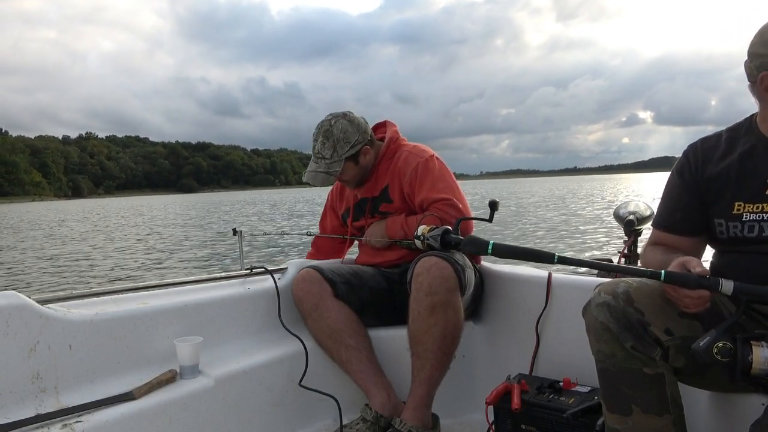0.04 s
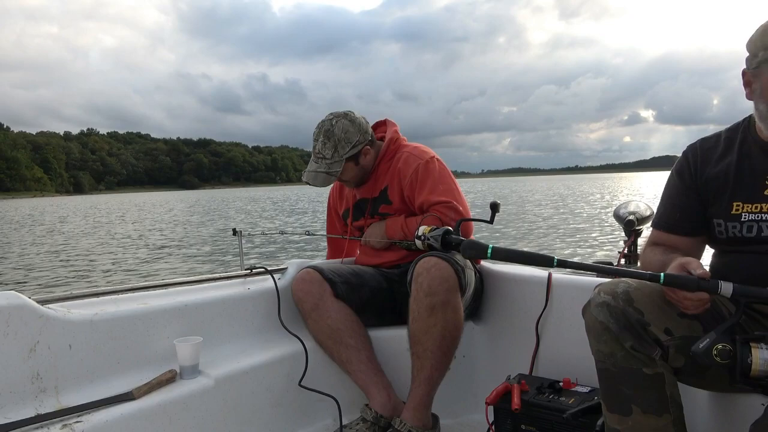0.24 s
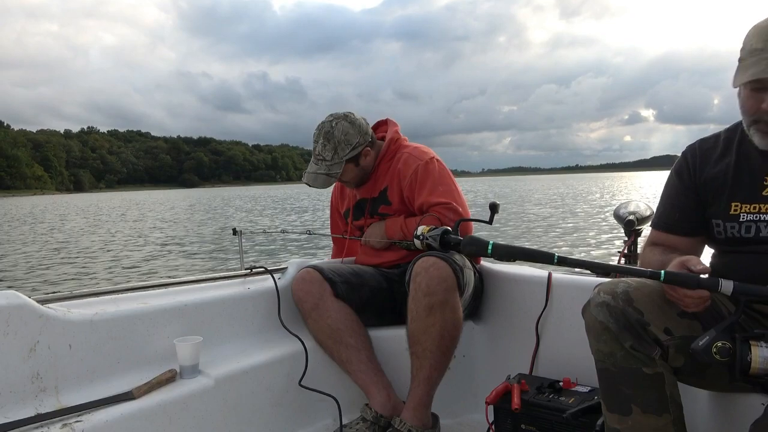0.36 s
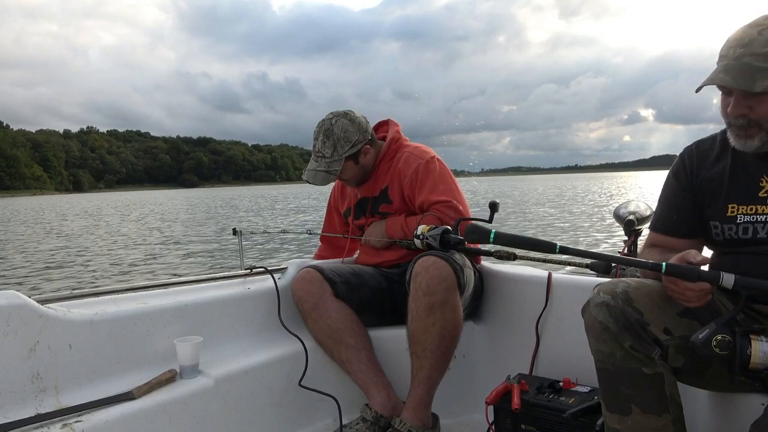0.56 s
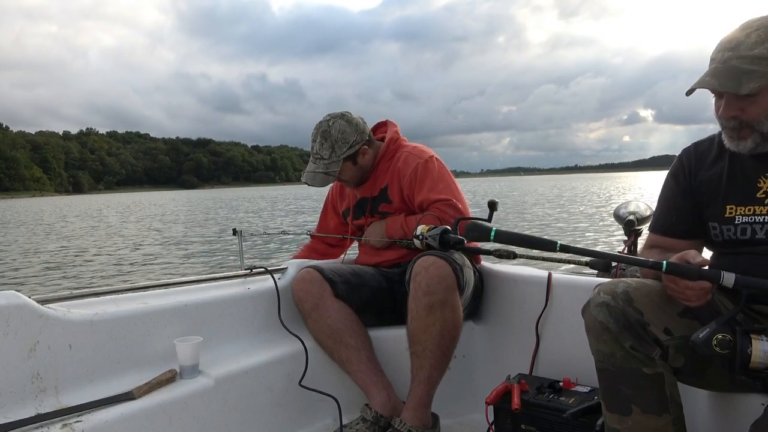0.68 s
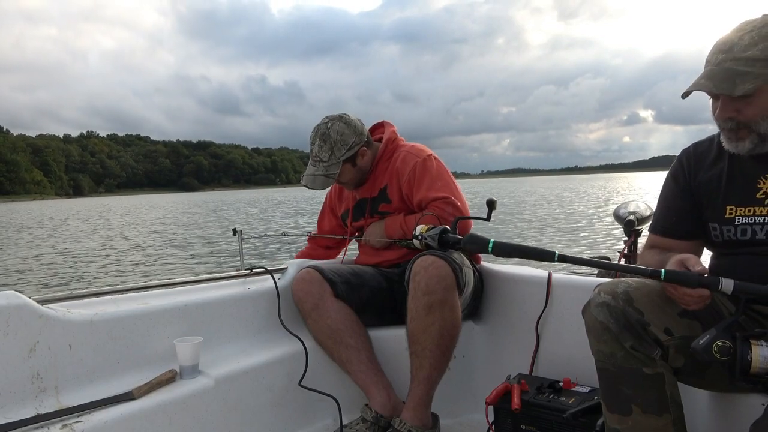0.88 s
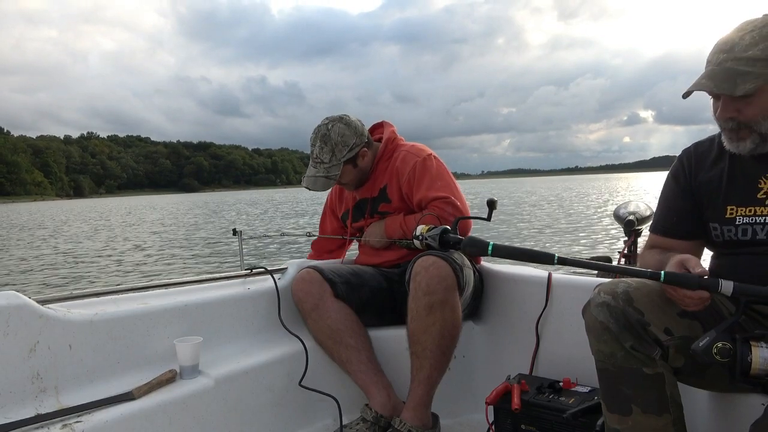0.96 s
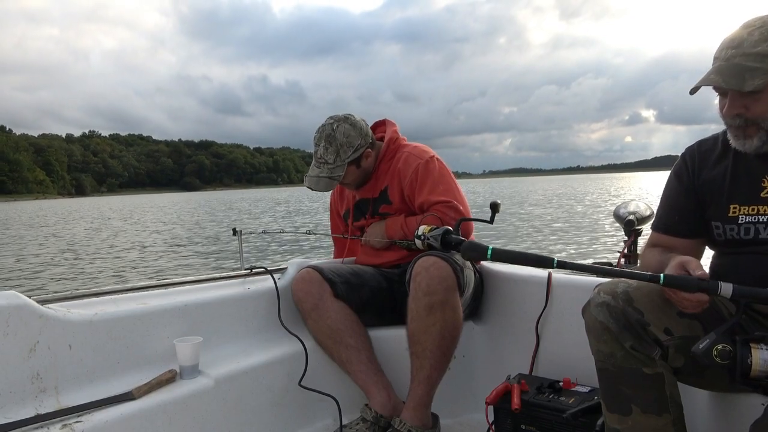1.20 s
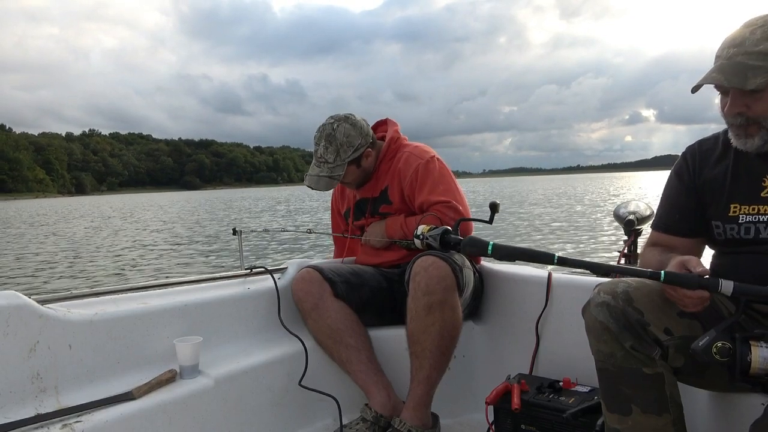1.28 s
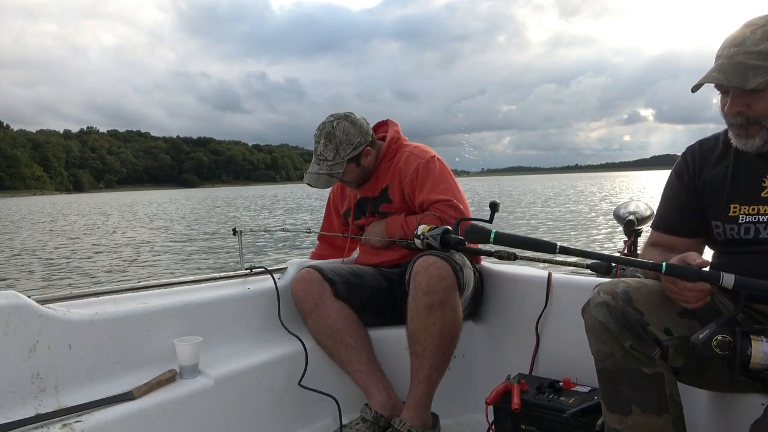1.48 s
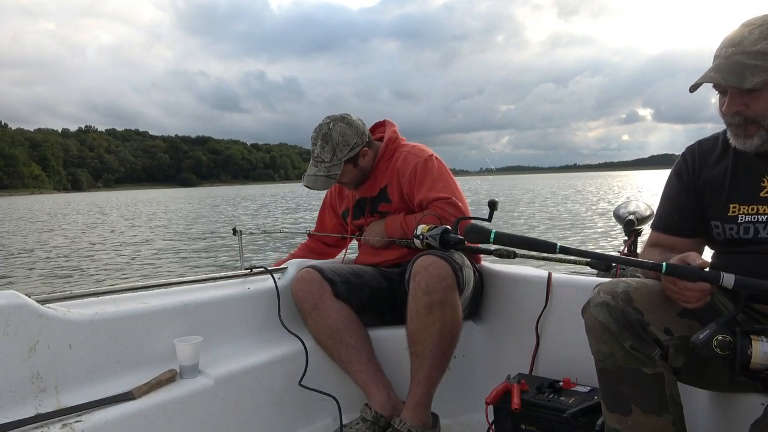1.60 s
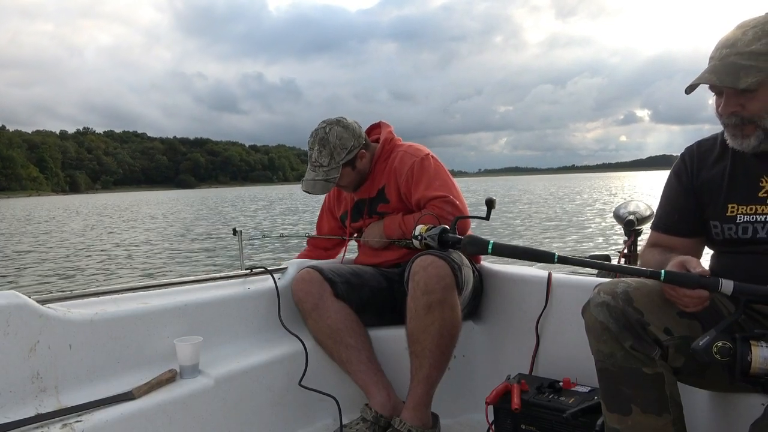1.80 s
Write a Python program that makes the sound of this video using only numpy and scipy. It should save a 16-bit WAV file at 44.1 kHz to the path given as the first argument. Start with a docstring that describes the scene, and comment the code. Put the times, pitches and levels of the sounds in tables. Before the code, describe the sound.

A wooden tool plops into water twice, with light splashes and wind on the microphone.

```python
"""Wind rumbles on the microphone over a faint wash of ripples. An angler strikes the lake beside a
small boat with a cupped wooden tool: it slaps the surface and drags down an air pocket that rings
with a hollow, rising plop, coloured by the hull. Spray patters back and a thin, far bird calls.
A soft swish leads into the second stroke, and the bird calls again as the drops fall."""
import sys
import numpy as np
from scipy import signal
from scipy.fft import rfft, irfft, next_fast_len
from scipy.io import wavfile
from scipy.ndimage import map_coordinates

SR = 44100
rng = np.random.default_rng(int(sys.argv[2]) if len(sys.argv) > 2 else 0)


def transcribe(signal):
    """Save signal, clipped to [-1, 1], as a 16-bit WAV file at the path in sys.argv[1]."""
    frames = np.atleast_2d(signal).T
    limited = np.clip(frames, -1, 1)
    pcm = np.round(limited * 32767).astype(np.int16)
    wavfile.write(sys.argv[1], SR, pcm)


N = 81585

# Tool strokes: entry_s, slap_db, open_s, plop_db, pitch_hz, rise_hz_per_s, top_hz, plop_t60_s,
# spray_db, spray_t60_s
TOOL_STROKES = [(.167, -23.5, .1803, 1.5, 175.6, 6180, 583, 0.11, -37, 0.41),
                (1.0679, -25.5, 1.0823, 1.5, 175.5, 6900, 506, 0.083, -34.5, 0.27)]
# Upper pocket modes: pitch_hz, rise_hz_per_s, top_hz, level_re_plop_db, t60_s, swell_s
POCKET_MODES = [(783.4, 7000, 1010, -17, .1, 0.032), (1230, 5700, 1500, -29, 0.056, 0.004)]
SHOVE_RE_PLOP_DB, SHOVE_HZ, SHOVE_T60_S = -15.5, 100.6, 0.085
ROUGHNESS_DB, DEEP_RING_DB, UPPER_RING_DB = 4, -18.5, -6

def plops():
    """The tool shoves the water; the air pocket rings in one deep mode and rough upper modes."""
    deep, upper = np.zeros(N), np.zeros(N)
    for entry_s, _, open_s, plop_db, hz, rise, top_hz, t60_s, _, _ in TOOL_STROKES:
        deep += amp(plop_db) * pocket(open_s, hz, rise, top_hz, t60_s, swell_s=0.004)
        shove = bubble(entry_s, SHOVE_HZ, 0, SHOVE_T60_S, swell_s=0.01)
        deep += amp(plop_db + SHOVE_RE_PLOP_DB) * shove
        for hz, rise, top_hz, mode_db, t60_s, swell_s in POCKET_MODES:
            level_db = plop_db + mode_db + ROUGHNESS_DB * wobble(knots_per_s=150)
            upper += amp(level_db) * pocket(open_s, hz, rise, top_hz, t60_s, swell_s)
    ring = amp(DEEP_RING_DB) * boat_ring(deep) + amp(UPPER_RING_DB) * boat_ring(upper)
    return filtered(deep + upper, hull) + ring


def pocket(start_s, hz, rise_hz_per_s, top_hz, t60_s, swell_s):
    """A big air pocket: pitch climbs as it closes, levelling off at top_hz."""
    t = since(start_s)
    pitch_hz = hz + (top_hz - hz) * np.tanh(rise_hz_per_s * t / (top_hz - hz))
    cycles = np.cumsum(pitch_hz * (t > 0)) / SR
    return -np.sin(2 * np.pi * cycles) * ring_envelope(t, swell_s, t60_s)


# Slap spectrum: freq_hz, gain_db
SLAP_SPECTRUM = [(180, -43), (300, 4.5), (731, -12.5), (1280, -5), (1750, -11), (2100, -6.5), (2360, -6),
                 (3230, -14.5), (4350, -14), (4800, -15), (5660, -16), (6250, -9), (7250, -22.5),
                 (9600, -24.5), (15500, -44)]
# Tool resonances: centre_hz, width_hz, lift_db
TOOL_MODES = [(1224, 370, 9), (2434, 74, 8.5), (4694, 130, 11), (6400, 300, 1)]

def slaps():
    """The tool hits the surface: a noise burst coloured by the ring of the wood."""
    def colour_db(f):
        wood_db = sum(db / (1 + (2 * (f - hz) / width_hz) ** 2) for hz, width_hz, db in TOOL_MODES)
        return along(SLAP_SPECTRUM, f) + wood_db

    out = np.zeros((2, N))
    for entry_s, slap_db, *_ in TOOL_STROKES:
        impact = coloured(crackle(per_s=9000, hiss=1.45), colour_db, NEAR_FIELD)
        out += amp(slap_db) * burst(entry_s, rise_s=0.0071, t60_s=0.042) * impact
    return out


# Spray spectrum: freq_hz, gain_db
SPRAY_SPECTRUM = [(200, -31), (650, -10), (950, 5), (1300, -7.5), (1800, -4.5), (2500, -10.5), (3500, -11),
                  (6000, -18.5), (8500, -21.5), (15000, -47)]

def spray():
    """Water tears into spray as each pocket opens."""
    out = np.zeros((2, N))
    for _, _, open_s, *_, spray_db, t60_s in TOOL_STROKES:
        tearing = coloured(crackle(per_s=1200, hiss=0.82), lambda f: along(SPRAY_SPECTRUM, f), NEAR_FIELD)
        out += amp(spray_db) * burst(open_s, 0.0056, t60_s) * tearing
    return out


# Falling spray spectrum: freq_hz, gain_db
PATTER_SPECTRUM = [(200, -20), (700, -0.5), (1150, 8), (1700, -8), (2400, -2), (3500, -7.5), (6000, -7.5),
                   (9000, -18), (15000, -26)]
PATTER_DB, PATTER_DELAY_S, PATTER_SPREAD_S = -54, 0.32, 0.15

def patter():
    """Spray falls back after each stroke."""
    out = np.zeros((2, N))
    for entry_s, *_ in TOOL_STROKES:
        fall = gaussian(entry_s + PATTER_DELAY_S, PATTER_SPREAD_S) * (since(entry_s) > 0)
        hits = coloured(crackle(per_s=220, hiss=0.99), lambda f: along(PATTER_SPECTRUM, f), WIDE_FIELD)
        out += amp(PATTER_DB) * fall * hits
    return out


# Ringing bubbles: falling drops, plus the gulp of the dipping tool at 1.019 s: start_s, level_db, pitch_hz,
# t60_s, tick_re_bubble_db
RINGING_BUBBLES = [(.211, -28.5, 1166, 0.075, -27), (.244, -28.5, 530, .05, -26),
                   (0.244, -35.5, 2650, .04, -10), (.272, -35.5, 1320, 0.042, -9),
                   (0.36, -50.5, 1050, 0.021, -0.5), (0.413, -50, 1300, 0.04, -14),
                   (0.514, -32.5, 1080, 0.026, -26), (.537, -45, 1070, 0.038, -3.5),
                   (.558, -41, 970, .035, -20), (1.0189, -24, 717, 0.012, -21.5),
                   (1.165, -41, 1190, 0.045, -9), (1.285, -35, 2410, 0.023, -17),
                   (1.286, -50, 437, 0.38, -16), (1.355, -41, 1260, .05, -29),
                   (1.386, -44.5, 1970, 0.033, -10), (1.409, -48, 1660, 0.14, -22),
                   (1.446, -39, 1230, 0.033, -13), (1.776, -44.5, 1120, 0.029, -16)]
# Small sharp splashes: start_s, level_db, centre_hz, t60_s
SPLASHING_DROPS = [(0.212, -44, 4540, 0.0091), (0.36, -45, 5400, 0.016), (0.522, -47.5, 9000, 0.05),
                   (0.901, -52, 5400, 0.046), (1.09, -29.5, 1660, .022), (1.2852, -39, 2310, 0.026),
                   (1.448, -46, 6000, .02), (1.547, -44, 6960, 0.027), (1.775, -43, 5660, 0.034)]
BUBBLE_RISE_PER_S, WET_CUTOFF_HZ = 2.1, 8900

def drops():
    """Larger drops tick and ring a bubble, or only splash; the dipping tool gulps once before the second
    stroke; wet contact softens the treble."""
    out = np.zeros((2, N))
    tick_noise = coloured(noise(), lambda f: along(PATTER_SPECTRUM, f), NEAR_FIELD)
    for start_s, db, hz, t60_s, tick_db in RINGING_BUBBLES:
        ring = bubble(start_s, hz, BUBBLE_RISE_PER_S * hz, t60_s, swell_s=0.00033)
        tick = amp(tick_db) * tick_noise * burst(start_s, rise_s=0.0013, t60_s=0.045)
        out += amp(db) * (ring + tick)
    for start_s, db, hz, t60_s in SPLASHING_DROPS:
        peak_db = lambda f: -7 * np.abs(np.log2((f + 1) / hz)) - 3 * np.log2(1 + f / hz)
        out += amp(db) * burst(start_s, 0.00076, t60_s) * coloured(noise(), peak_db, NEAR_FIELD)
    return filtered(out, lambda f: 1 / np.sqrt(1 + (f / WET_CUTOFF_HZ) ** 4))


DRIPS_PER_STROKE, DRIP_DB, DRIP_HZ, DRIP_LOG_SPREAD, DRIP_T60_CYCLES = 48, -52, 3614, 0.454, 82

def drips():
    """Returning spray traps tiny bubbles, spread over the water."""
    out = np.zeros((2, N + SR))
    t = np.arange(SR // 20) / SR
    for entry_s, *_ in TOOL_STROKES:
        for when, pitch, size, side in rng.standard_normal((DRIPS_PER_STROKE, 4)):
            hz = np.clip(DRIP_HZ * np.exp(DRIP_LOG_SPREAD * pitch), 800, 7000)
            delay_s = np.clip(PATTER_DELAY_S + PATTER_SPREAD_S * when, 0.06, 0.7)
            start = int((entry_s + delay_s) * SR)
            tone = np.sin(2 * np.pi * hz * t * (1 + BUBBLE_RISE_PER_S * t / 2))
            gain = amp(DRIP_DB + 2.3 * size + 2 * side * np.array([[1], [-1]]))
            out[:, start:start + len(t)] += gain * tone * ring_envelope(t, 0.00042, DRIP_T60_CYCLES / hz)
    return out[:, :N]


def bubble(start_s, hz, rise_hz_per_s, t60_s, swell_s):
    """Trapped air rings, its pitch climbing as it shrinks."""
    t = since(start_s)
    return -np.sin(2 * np.pi * (hz * t + rise_hz_per_s * t * t / 2)) * ring_envelope(t, swell_s, t60_s)


# Hull standing waves: centre_hz, width_hz, left_gain, right_gain
HULL_MODES = [(305, 36, 1.2, -.55), (415, 40, .6, .4), (945, 40, .7, .7)]
# Reflections off the far parts of the boat: delay_s, gain
BOAT_ECHOES = [(.0201, .12), (.0352, .055), (.0478, .045)]

def hull(f):
    """Stereo response: direct sound, standing waves and echoes."""
    modes = sum(np.array([[left], [right]]) * 1j * f * width_hz / (hz * hz - f * f + 1j * f * width_hz)
                for hz, width_hz, left, right in HULL_MODES)
    echoes = sum(gain * np.exp(-2j * np.pi * f * delay_s) for delay_s, gain in BOAT_ECHOES)
    return 1 + modes + echoes


# Boat decay: freq_hz, t60_s
BOAT_DECAY = [(150, 0.18), (300, .2), (1000, 0.053), (4000, 0.3), (12000, 0.12)]

def boat_ring(x):
    """The short diffuse ring of the open boat."""
    hz, t, spectra = signal.stft(rng.standard_normal((2, SR // 4)), SR, nperseg=256)
    decay = amp(-60 * t / along(BOAT_DECAY, hz)[:, None])
    _, tail = signal.istft(spectra * decay, SR, nperseg=256)
    tail = np.pad(tail / np.linalg.norm(tail[0]), ((0, 0), (SR // 200, 0)))  # 5 ms predelay
    return signal.fftconvolve(x * np.ones((2, 1)), tail, axes=1)[:, :N]


# Swish spectrum: freq_hz, gain_db
SWISH_SPECTRUM = [(290, -62), (500, -26), (629, -6), (1410, -2.5), (1720, -15), (1850, -13), (6740, -12.5),
                  (15500, -21)]
SWISH_DB, SWISH_CUTOFF_HZ = -43, 13000

def swish():
    """A soft hiss swells and fades before the second stroke."""
    colour_db = lambda f: along(SWISH_SPECTRUM, f) - 10 * np.log10(1 + (f / SWISH_CUTOFF_HZ) ** 6)
    swell = gaussian(centre_s=0.997, sigma_s=0.016)
    return amp(SWISH_DB) * swell * coloured(noise(), colour_db, WIDE_FIELD)


# Gusts, in four consecutive groups: time_s, rumble_db, flutter_db, left_minus_right_db
GUSTS = [
    [(0.02, -32, -46, -0.5), (0.038, -34, -31.5, 6.5), (0.058, -30.5, -35, 11), (0.088, -27, -47.5, 11.0),
     (0.114, -34.5, -62, 0), (0.142, -34, -51, 18), (0.16, -24.5, -43, 5)],
    [(0.25, -37.5, -25.5, 8), (0.416, -26, -30, 8), (0.448, -43, -37, 7), (0.482, -24.5, -26.5, 8),
     (0.542, -24, -34.5, 6.5), (0.588, -35.5, -32.5, 7), (0.66, -32.5, -37.5, 3.0)],
    [(0.67, -30, -31.5, 7), (0.742, -21.5, -31.5, 6.5), (0.882, -32, -42, 16), (0.908, -32.5, -36, 0),
     (0.974, -31, -29.5, 8), (1.028, -25, -39.5, -21), (1.055, -26.5, -38, 3.5)],
    [(1.15, -46, -46, 1), (1.216, -34.5, -49, -9.5), (1.326, -31.5, -36, 11), (1.464, -35, -38.5, 2.5),
     (1.546, -25, -34, 15.5), (1.804, -34, -47.5, -5), (1.85, -55, -38, 9)],
]
# Buffeting spectra: freq_hz, gain_db
RUMBLE_SPECTRUM = [(10, -7), (25, 0.5), (48, -0.5), (70, -3), (100, -17), (200, -22), (1000, -120)]
FLUTTER_SPECTRUM = [(30, -23), (65, -3.5), (95, 1.5), (130, -11), (170, -17), (220, -24.5), (320, -25.5),
                    (500, -48), (1000, -57), (3000, -120)]
RUMBLE_TRIM_DB, FLUTTER_TRIM_DB = 6, 2.5

def wind():
    """Gusts buffet each microphone port separately, the left more: deep rumble, higher flutter."""
    time_s, rumble_db, flutter_db, pan_db = np.concatenate(GUSTS).T

    def buffet(spectrum, level_db):
        turbulence = unit(filtered(noise(), lambda f: amp(along(spectrum, f))))
        return amp(curve(np.c_[time_s, level_db])) * turbulence

    rumble = buffet(RUMBLE_SPECTRUM, rumble_db + RUMBLE_TRIM_DB)
    flutter = buffet(FLUTTER_SPECTRUM, flutter_db + FLUTTER_TRIM_DB)
    pan = amp(curve(np.c_[time_s, pan_db]) * np.array([[0.5], [-0.5]]))
    pan /= np.sqrt(np.mean(pan ** 2, axis=0))
    return pan * (rumble + flutter)


# Ripple spectrum: freq_hz, gain_db
RIPPLE_SPECTRUM = [(240, -21), (400, -8), (511, -5.5), (834, -10), (914, -8), (1260, -11.5), (2970, -17.5),
                   (3460, -19.5), (5070, -19), (6090, -21.5), (15500, -27.5)]
# Ripple loudness: time_s, level_db
RIPPLE_LEVEL = [(0.0, -50.5), (0.458, -53.5), (0.716, -54), (0.948, -55), (1.246, -53.5), (1.586, -56),
                (1.85, -53.5)]

def ripples():
    """The lake's even wash: tiny splashes in hiss."""
    wash = coloured(crackle(per_s=600, hiss=2.74), lambda f: along(RIPPLE_SPECTRUM, f), WIDE_FIELD)
    return amp(curve(RIPPLE_LEVEL)) * wash


# Bird calls: start_s, level_db, pitch_hz, length_s
BIRD_CALLS = [(0.721, -58.5, 5150, 0.044), (1.228, -58, 5570, .055)]
BIRD_FALL_HZ, BIRD_TRIM_DB = 800, -3

def bird():
    """Thin falling calls from far away."""
    calls = np.zeros(N)
    for start_s, db, hz, length_s in BIRD_CALLS:
        progress = np.minimum(since(start_s) / length_s, 1)
        pitch_hz = hz - BIRD_FALL_HZ * progress ** 2
        calls += amp(db) * np.sin(np.pi * progress) * np.sin(2 * np.pi * np.cumsum(pitch_hz) / SR)
    return amp(BIRD_TRIM_DB) * (calls + boat_ring(calls))


# Left-right likeness of close and spread sources: freq_hz, correlation
NEAR_FIELD = [(300, 0.94), (1300, 0.97), (4000, 0.82), (8000, 0.19), (15000, 0.085)]
WIDE_FIELD = [(100, .3), (600, 0.41), (1300, 0.66), (3000, 0.17), (7000, 0.083), (15000, 0.044)]

def coloured(pair, colour_db, field):
    """Two unrelated signals as stereo of rms 1, with the given spectrum and correlation."""
    def response(hz):
        angle = np.arccos(np.clip(along(field, hz), -1, 1)) / 2
        return amp(colour_db(hz)) * np.array([np.cos(angle), np.sin(angle)])

    mid, side = filtered(pair, response)
    return unit(np.array([mid + side, mid - side]))


def filtered(x, response):
    size = next_fast_len(N + SR // 2)
    return irfft(rfft(x, size) * response(np.fft.rfftfreq(size, 1 / SR)), size)[..., :N]


def noise():
    return rng.standard_normal((2, N))


def crackle(per_s, hiss):
    """Tiny random impacts over a share of hiss."""
    hits = rng.random(N) < per_s / SR
    return unit(noise() * hits) + hiss * noise()


def wobble(knots_per_s):
    """A smooth random curve."""
    knots = rng.standard_normal(int(N * knots_per_s / SR) + 4)
    return map_coordinates(knots, [np.arange(N) * knots_per_s / SR])


def burst(start_s, rise_s, t60_s):
    """Linear rise, exponential fall."""
    return np.minimum(since(start_s) / rise_s, 1) * amp(-60 * since(start_s + rise_s) / t60_s)


def ring_envelope(t, swell_s, t60_s):
    return (1 - np.exp(-t / swell_s)) * amp(-60 * t / t60_s)


def gaussian(centre_s, sigma_s):
    return np.exp(-((np.arange(N) / SR - centre_s) / sigma_s) ** 2 / 2)


def since(start_s):
    return np.maximum(np.arange(N) / SR - start_s, 0)


def along(rows, hz):
    """Interpolate (freq_hz, value) rows on a log axis."""
    freq_hz, values = np.transpose(rows)
    return np.interp(np.log(hz + 1), np.log(freq_hz + 1), values)


def curve(rows):
    """Interpolate (time_s, value) rows per sample."""
    return np.interp(np.arange(N) / SR, *np.transpose(rows))


def amp(db):
    return 10 ** (np.asarray(db) / 20)


def unit(x):
    return x / np.sqrt(np.mean(x ** 2) + 1e-20)


SPLASH_PAN_DB, SPLASH_RING_DB, BAND_LIMIT_HZ = 0.94, -9, 15850

def scene():
    """Plops and splashes beside the boat, over wind, ripples and the bird."""
    splashes = drops() + slaps() + spray() + patter() + drips()
    splashes *= amp([[SPLASH_PAN_DB], [-SPLASH_PAN_DB]])
    strokes = plops() + splashes + amp(SPLASH_RING_DB) * boat_ring(splashes)
    return strokes + swish() + bird() + wind() + ripples()


def record(dry):
    """Brick-wall low-pass."""
    return filtered(dry, lambda hz: hz < BAND_LIMIT_HZ)


dry = scene()
out = record(dry)
transcribe(out)
```